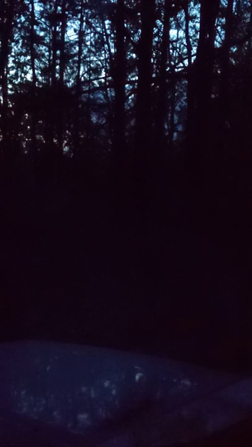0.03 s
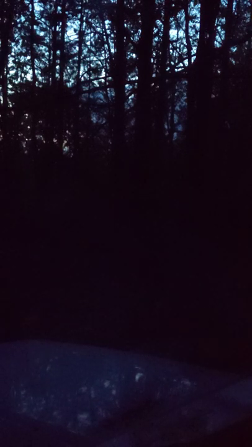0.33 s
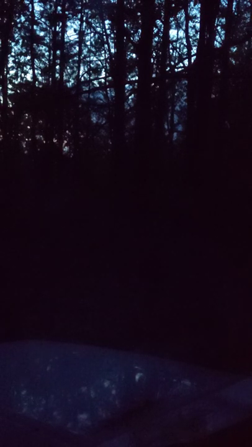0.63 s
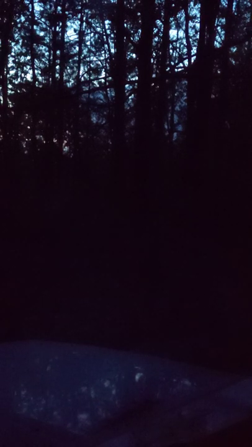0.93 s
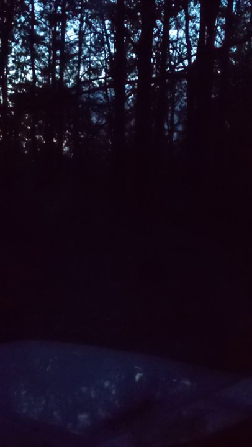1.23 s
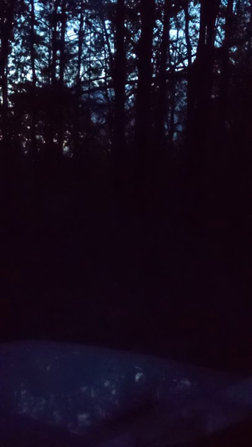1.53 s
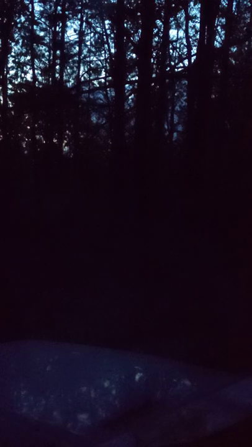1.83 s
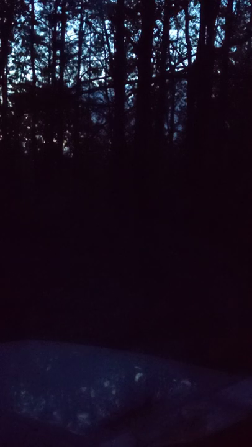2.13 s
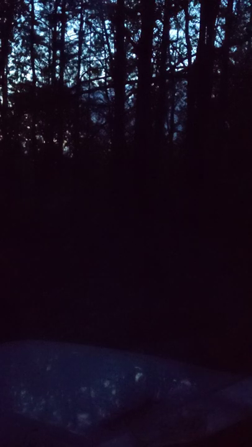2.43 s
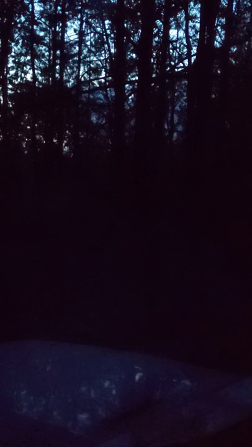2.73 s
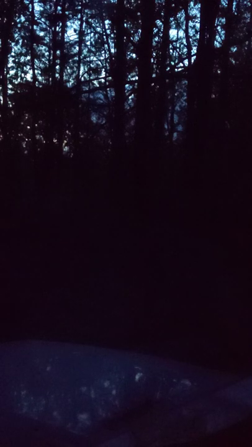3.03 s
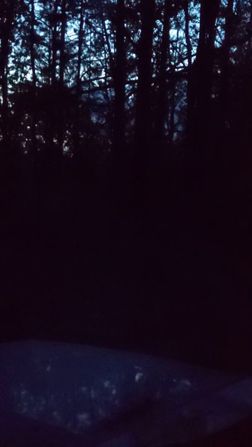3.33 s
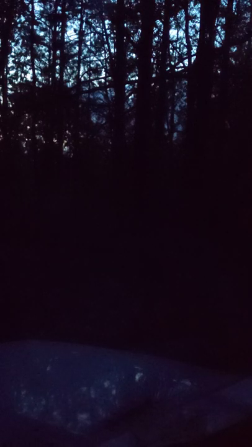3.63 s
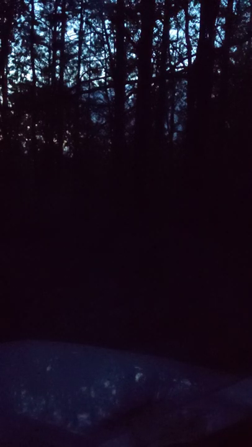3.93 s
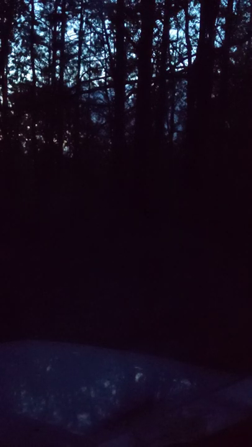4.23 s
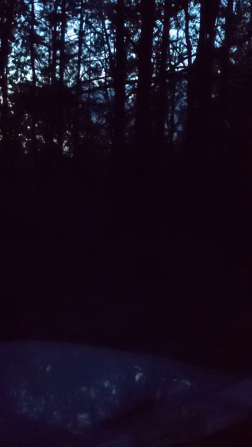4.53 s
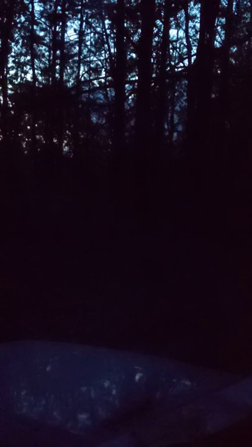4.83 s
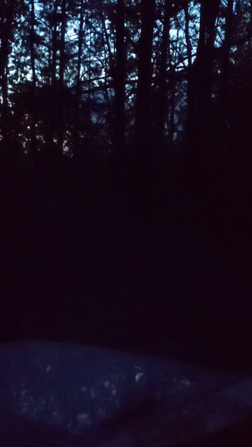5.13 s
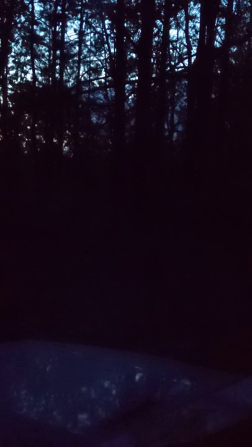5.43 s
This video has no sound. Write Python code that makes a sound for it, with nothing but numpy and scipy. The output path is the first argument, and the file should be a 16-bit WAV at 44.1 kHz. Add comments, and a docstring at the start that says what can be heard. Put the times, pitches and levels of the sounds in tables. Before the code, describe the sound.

In a still forest, a nearby owl gives seven deep, slightly raspy hoots, each higher and louder, echoing among the trunks. Twigs crackle briefly close to the microphone just as a second owl answers from far away with five faint, higher hoots and one long falling note. A soft hiss and a low distant rumble continue underneath.

```python
"""Two owls in a still forest at dusk, over a faint hiss and a low distant rumble.
First the near owl gives seven rising hoots, each a buzz shaped by its throat.
Partway through, twigs start to crackle close by, thickest just after 3 s.
By then the far owl is answering with five short hoots, and it ends on a long falling note,
carried mostly by echoes among the trunks."""
import sys
import numpy as np
from scipy import signal
from scipy.fft import rfft, irfft, next_fast_len
from scipy.io import wavfile
from scipy.ndimage import map_coordinates

SR = 44100
rng = np.random.default_rng(int(sys.argv[2]) if len(sys.argv) > 2 else 0)


def to_wav(sig):
    """Store sig (one row per channel, or 1-D mono) as 16-bit WAV at the path in sys.argv[1].

    Samples outside -1..1 are clipped; the rate is SR.
    """
    pcm = np.clip(np.atleast_2d(sig), -1, 1) * 32767
    pcm = np.round(pcm).astype(np.int16)
    wavfile.write(sys.argv[1], SR, pcm.T)  # frames by channels


N = 250929
TIME = np.arange(N) / SR

# Levels in a table are relative to one another.
# Near hoots: start_s, rise_s, fall_s, first_hz, crest_hz (before the flip), last_hz, flip_share, level_db
NEAR_HOOTS = [(.56, 0.06, 0.051, 111.4, 159.1, 115.7, 0.025, -42),
              (.825, 0.087, 0.055, 185.4, 238.5, 189.4, 0.21, -43.5),
              (1.155, 0.064, 0.055, 193.8, 309.3, 181.1, 0.047, -41.5),
              (1.52, .096, .062, 225, 360, 209.2, 0.34, -40.5),
              (1.885, .09, .065, 245.6, 391, 215.3, .5, -38),
              (2.235, .1, .065, 239.8, 421.4, 219, 0.55, -38),
              (2.437, 0.12, .19, 272.7, 420.4, 190, .56, -37.5)]
# The near voice mostly grows louder as it climbs: pitch_hz, level_db
NEAR_LOUDNESS = [(110, -21.5), (165, -18), (240, -9.5), (280, -13), (335, -10), (450, -2.5), (530, 1.5)]
# What each owl's throat lets through: frequency_hz, level_db
NEAR_THROAT = [(120, -32), (220, -5.5), (310, -2.5), (480, 9.5), (620, -2), (780, -18.5), (1000, -15.5),
               (1200, -30.5), (1550, -22), (1900, -42), (2600, -29), (3300, -35), (4000, -58)]
FAR_THROAT = [(200, -17), (310, -1.5), (520, 8.5), (730, 11.5), (900, 4.5), (1080, -9), (1300, -38),
              (1620, -10), (2150, -14), (2700, -22), (3300, -13.5), (4000, -39)]
# Ground and trunk reflections favour one side: frequency_hz, left_over_right_db
NEAR_SIDES = [(220, 1.5), (320, 1), (440, -3), (490, -3), (530, 4.5), (700, 7.5), (1500, 1.5)]
# The far owl's short hoots: start_s, length_s, top_pitch_hz, level_db
FAR_HOOTS = [(2.957, 0.13, 526, -57.5), (3.313, 0.13, 527.6, -56.5), (3.678, 0.13, 538.7, -56),
             (4.044, .146, 545, -56.5), (4.424, 0.13, 539.9, -55)]
# The shape they all share: share_of_length, share_of_top_pitch, level_db
FAR_HOOT_SHAPE = [(0, .57, -7.5), (0.162, .67, -0.5), (0.299, .71, -0.5), (.39, .93, 5.5),
                  (0.499, 0.98, 4.5), (0.599, 1, 2), (.74, .97, -5.5), (.85, .65, -0.5), (0.999, .47, -4)]
# The far owl's long last note: time_s, pitch_hz, level_db
FAR_LAST_NOTE = [(4.585, 327, -61.5), (4.62, 378.7, -54.5), (4.645, 514.8, -56), (4.76, 552.6, -53),
                 (4.82, 541.5, -56), (4.905, 495, -55.5), (4.917, 374.4, -56), (5.15, 306.6, -59.5),
                 (5.22, 275.3, -66)]
# Paths from each owl, direct first, then off the trunks:
# delay_s, level_db, left_over_right_db, left_lead_ms, low_hz, high_hz
NEAR_PATHS = [(0, -0.5, 0, 0.1, 62.5, 6300), (.047, -11.5, -1, 0.32, 395, 1520),
              (.125, -22, 6, -.2, 400, 900)]
FAR_PATHS = [(0, -5.5, .5, -1.0, 200, 4500), (.095, -1.5, 1, .05, 495, 600), (.175, -6.5, 1, .1, 500, 580),
             (.25, -13, 1, .1, 500, 580)]
# Cracking twigs: start_s, level_db, brightness_db_per_octave
TWIG_CRACKS = [(1.832, -77.5, 15.5), (1.9278, -74.5, 13.5), (2.144, -67, -5.5), (2.2107, -74.5, 16),
               (2.8225, -72.5, -7), (2.989, -55.5, -0.5), (3.0945, -80, -18), (3.1279, -54.5, -5),
               (3.1319, -57.5, -6), (3.152, -51, 8), (3.1616, -50.5, 5), (3.1733, -51.5, 3),
               (3.1881, -39, 0), (3.1918, -46, -1), (3.2021, -44.5, -2), (3.2946, -54, 8),
               (3.449, -66.5, 10), (3.5193, -70, -13), (3.5929, -73, -5), (4.338, -67.5, -5),
               (4.684, -57, 5.5), (4.916, -68, -1), (4.949, -67, 9)]
# The tone colour of a crack: frequency_hz, level_db
TWIG_COLOUR = [(700, 8), (1100, -4), (1800, 1), (2300, -26), (3200, 1), (4000, -3.5), (4700, -17),
               (5700, -0.5), (7200, -4), (9500, -4), (16000, -6.5)]
# The bands a crack is split into: low_hz, high_hz
TWIG_BANDS = [(800, 2100), (2700, 4800), (4800, 9000), (9000, 13000), (13000, 16000)]
# Each band's place on the brightness slope: position_octaves, level_db
TWIG_BAND_LEVELS = [(-0.64, -9), (-0.93, -0.5), (-0.12, 0), (0.58, -2), (1.445, -4.5)]
# Soft swells of the hiss: centre_s, half_width_s, peak_db
HISS_SWELLS = [(.9, 0.095, -68.5), (1.72, 0.15, -70.5), (2.25, 0.24, -66), (2.48, 0.1, -64),
               (2.78, 0.096, -67), (3.02, 0.24, -68.5), (3.68, .15, -69), (4.16, 0.18, -69.5),
               (4.77, 0.13, -68), (5.37, 0.26, -67), (5.62, 0.15, -76.5)]
# Tone colours of the background noises: frequency_hz, level_db
HISS_COLOUR = [(900, -4), (1800, -3.5), (2700, -1.5), (4000, -4.5), (6500, -5.5), (12000, -4.5),
               (16000, -0.5)]
AIR_COLOUR = [(100, -16), (170, -6), (284, -3), (423, 1), (730, -7), (804, -10), (830, -7), (2200, -24.5),
              (2860, -28), (4840, -120)]
RUMBLE_COLOUR = [(12, -20), (20, 2.5), (49, -5.5), (93, 2.5), (115, -7.5), (140, -16), (180, -38),
                 (310, -120)]
# How alike left and right noise are: frequency_hz, correlation (1 = the same)
STEREO_LIKENESS = [(60, 1), (130, 0.71), (300, 0.66), (600, 0.33), (1400, 0.14), (3000, 0)]
# Where the microphone's case rings: frequency_hz, width_hz, boost_db
CASE_RESONANCES = [(3930, 1140, 10), (5590, 610, 10.5), (7340, 710, 6.5), (9530, 650, 6.5),
                   (11610, 140, 8.5), (15000, 1800, 1.5)]


def near_owl():
    """Seven arched hoots that grow higher and louder, leaning left or right with their pitch."""
    pitch, gain = arched_hoots(NEAR_HOOTS)
    gain = gain * from_db(at_hz(NEAR_LOUDNESS, pitch))
    hoots = voice(pitch, gain, NEAR_THROAT, slope_db=-1.5, clear_slope_db=-1, even_db=-14, rasp=.036)
    heard = forest(hoots, NEAR_PATHS, tail_db=-9.5, ring_s=.92, build_s=.0022,
                   colour=[(200, -6.5), (500, -5), (900, 6.5), (1500, -3), (4000, -6)])
    size = next_fast_len(N + 2000)
    hz = np.arange(size // 2 + 1) * SR / size
    return irfft(rfft(heard, size) * pan(at_hz(NEAR_SIDES, hz)), size)[:, :N]


def arched_hoots(hoots):
    """Pitch and gain of hoots that climb and fall; near a strong crest the voice flips up a register."""
    flip_ratio, flip_s, fade_s = 1.26, .011, .01596
    roundness, tiring_db_per_s = 1.95, 4
    pitch, gain = np.full(N, 200.), np.zeros(N)
    for start_s, rise_s, fall_s, first_hz, crest_hz, last_hz, flip_share, level_db in hoots:
        from_crest_s = TIME - start_s - rise_s
        side_s = np.where(from_crest_s < 0, rise_s, fall_s)
        foot_hz = np.where(from_crest_s < 0, first_hz, last_hz)
        away = np.abs(from_crest_s) / side_s   # 0 at the crest, 1 at either end
        arch_hz = crest_hz * (foot_hz / crest_hz) ** (np.minimum(away, 1) ** roundness)
        flipped = np.clip((flip_share - away) * side_s / flip_s, 0, 1)
        envelope = np.clip((1 - away) * side_s / fade_s + .5, 0, 1)
        pitch = np.where(envelope > 0, arch_hz * flip_ratio ** flipped, pitch)
        gain += envelope * from_db(level_db - tiring_db_per_s * (TIME - start_s))
    return pitch, gain


def far_owl():
    """Five hoots that each open with a yelp, then a long note that breaks down into a hoarse tail."""
    notes = []
    for start_s, length_s, top_hz, level_db in FAR_HOOTS:
        notes.append([(start_s + length_s * along, top_hz * share, level_db + swell_db)
                      for along, share, swell_db in FAR_HOOT_SHAPE])
    notes.append(FAR_LAST_NOTE)
    pitch, _ = in_time([point for note in notes for point in note])
    gain = note_gain(notes, fade_s=.014)
    hoots = voice(pitch, gain, FAR_THROAT, slope_db=-5, clear_slope_db=4, even_db=-13, rasp=.05)
    # branches round the perch blur each note; the wider forest rings longer
    branches = forest(hoots, [], tail_db=-3.5, ring_s=.35, build_s=.0022,
                      colour=[(200, 7), (350, -2), (530, -7), (730, -6), (1000, .5), (4000, -6.5)])
    trunks = forest(hoots, FAR_PATHS, tail_db=-7, ring_s=1.3, build_s=.011,
                    colour=[(200, -3), (350, -8.5), (520, 3.5), (750, -3), (1500, 2.5), (4000, -2.5)])
    return branches + trunks


def note_gain(notes, fade_s):
    """Gain of a row of notes, each fading in and out."""
    gain = np.zeros(N)
    for note in notes:
        _, level_db = in_time(note)
        inside_s = np.minimum(TIME - note[0][0], note[-1][0] - TIME)
        gain += np.clip(inside_s / fade_s + .5, 0, 1) * from_db(level_db)
    return gain


def voice(pitch, gain, throat, slope_db, clear_slope_db, even_db, rasp):
    """Harmonics shaped by the throat: reedy and rough when low, pure and hollow when high."""
    clear = np.clip((pitch - 350) / 100, 0, 1)   # 0 below 350 Hz, 1 above 450 Hz
    unsteady = rasp * (1 - .96 * clear)
    phase = 2 * np.pi * np.cumsum(pitch * (1 + unsteady * drift(350))) / SR
    wave, power = 0, 0
    for k in range(1, 11):
        tilt_db = (slope_db + clear_slope_db * clear) * np.log2(k)   # slopes are per octave
        hollow_db = even_db * clear * (k % 2 == 0)   # a symmetric vibration has weak even harmonics
        weight = from_db(at_hz(throat, k * pitch) + tilt_db + hollow_db)
        wave += weight * np.sin(k * phase)
        power += weight ** 2 / 2
    flutter = 1 + 4 * unsteady * drift(250)
    return gain * wave / np.sqrt(power) * flutter


def forest(sound, paths, tail_db, ring_s, build_s, colour):
    """Sound arrives along the given paths, with a tail scattered by countless trunks or branches."""
    t = TIME[:2 * SR]
    scatter = noise(colour, size=len(t)) * from_db(-60 * t / ring_s) * (1 - np.exp(-t / build_s))
    scatter /= rms(np.abs(rfft(scatter, SR))[:, 350:700])   # gain 1 in the hoots' range, 350-700 Hz
    out = from_db(tail_db) * signal.fftconvolve(sound[None], scatter, axes=1)[:, :N]
    for delay_s, level_db, left_db, lead_ms, low_hz, high_hz in paths:
        arrived = band_pass(sound, [low_hz, high_hz])
        lags_s = delay_s, delay_s + lead_ms / 1000   # left, right
        delayed = np.array([np.interp(TIME - lag, TIME, arrived, left=0) for lag in lags_s])
        out += from_db(level_db) * pan(left_db) * delayed
    return out


def twigs():
    """Each crack is a burst of under a millisecond with a short rustle, from dull snap to thin tick."""
    out, t = np.zeros((2, N + SR)), TIME[:SR // 9]
    snap = np.exp(-t / .00016)
    splinters = from_db(-15) * (np.exp(-t / .007) + np.exp(-t / .011))
    for start_s, level_db, brightness in TWIG_CRACKS:
        burst = noise(TWIG_COLOUR, size=len(t)) * (snap + splinters)
        at = int(start_s * SR)
        for edges_hz, (octaves, band_db) in zip(TWIG_BANDS, TWIG_BAND_LEVELS):
            part = band_pass(burst, edges_hz, order=4)
            part /= rms(part[:, :130])   # the first 3 ms set the level
            out[:, at:at + len(t)] += from_db(level_db + band_db + brightness * octaves) * part
    return out[:, :N] * pan(2.15)


def hiss_and_air():
    """A hiss swells and sinks like a soft rustle; the lower hush of forest air follows it gently."""
    rest_db = -71.5   # on the same scale as the swells
    swell_power = sum(from_db(peak_db - rest_db) ** 2 * np.exp(-((TIME - centre_s) / width_s) ** 2)
                      for centre_s, width_s, peak_db in HISS_SWELLS)
    rise_db = 10 * np.log10(1 + swell_power)
    hiss = from_db(-75.5 + rise_db) * noise(HISS_COLOUR) * pan(1)
    air = from_db(-74 + .52 * rise_db) * noise(AIR_COLOUR)
    return hiss + air


def distant_rumble():
    """A low, uneven rumble with a faint wavering drone."""
    rumble = from_db(-72.4 + 2.3 * drift(9)) * noise(RUMBLE_COLOUR)
    drone_gain = np.sqrt(2) * from_db(-81 + 1.43 * drift(5))
    drone_hz = 109.2 + 3 * drift(10)
    return rumble + drone_gain * np.sin(2 * np.pi * np.cumsum(drone_hz) / SR)


def noise(colour, size=N):
    """Stereo noise of a given tone colour, alike on both sides in the bass; rms 1."""
    hz = np.arange(size // 2 + 1) * SR / size
    middle, side = rfft(rng.standard_normal((2, size)))
    alike = np.clip(at_hz(STEREO_LIKENESS, hz), -1, 1)
    both = np.sqrt(1 + alike) * middle + np.sqrt(1 - alike) * side * [[1], [-1]]
    coloured = irfft(both * from_db(at_hz(colour, hz)), size)
    return coloured / rms(coloured)


def drift(per_second):
    """A random wander: values of about size 1, joined by straight lines."""
    values = rng.standard_normal(int(N / SR * 2000) + 4)
    return map_coordinates(values, [TIME * per_second], order=1)


def band_pass(sound, edges_hz, order=2):
    """Keep what lies between two frequencies."""
    return signal.sosfilt(signal.butter(order, edges_hz, "band", fs=SR, output="sos"), sound)


def in_time(rows):
    """Join timed points with straight lines, one curve for each value column."""
    times_s, *columns = np.transpose(rows)
    return [np.interp(TIME, times_s, column) for column in columns]


def at_hz(points, hz):
    """Read a table by frequency, with octaves evenly spaced."""
    points_hz, values = np.transpose(points)
    return np.interp(np.log(np.maximum(hz, 1)), np.log(points_hz), values)


def pan(left_db):
    """Gains that make the left side left_db louder than the right."""
    return from_db(np.array([[.5], [-.5]]) * left_db)


def rms(sound):
    """Average strength (root mean square)."""
    return np.sqrt(np.mean(sound ** 2) + 1e-20)


def from_db(db):
    """Decibels to gain."""
    return 10 ** (np.asarray(db) / 20)


def scene():
    """Both owls, the twigs and the background."""
    owls = near_owl() + from_db(1.13) * far_owl()
    return owls + from_db(-5) * twigs() + hiss_and_air() + distant_rumble()


def record(dry):
    """The microphone's case colours the treble; the very top is cut steeply."""
    out, cutoff_hz = dry, 15900
    for hz, width_hz, boost_db in CASE_RESONANCES:
        ringing = signal.lfilter(*signal.iirpeak(hz, hz / width_hz, fs=SR), dry)
        out = out + (from_db(boost_db) - 1) * ringing
    return signal.sosfilt(signal.ellip(12, .05, 70, cutoff_hz, fs=SR, output="sos"), out)


dry = scene()
out = record(dry)
to_wav(out)
```